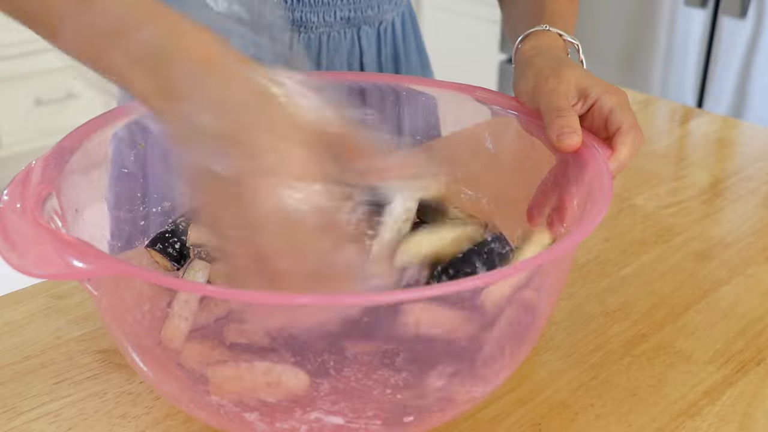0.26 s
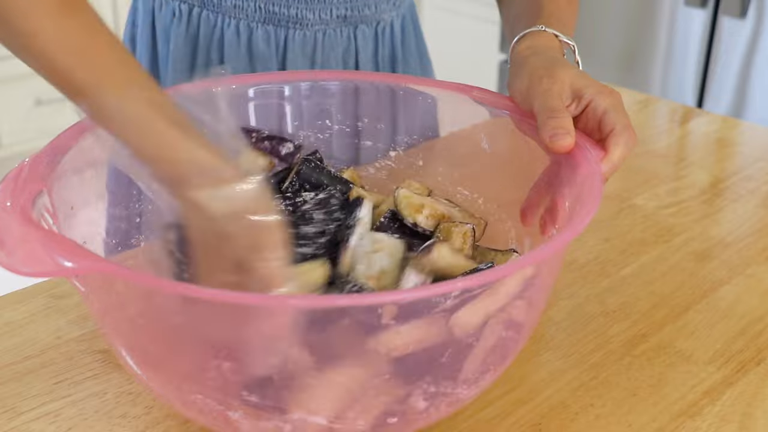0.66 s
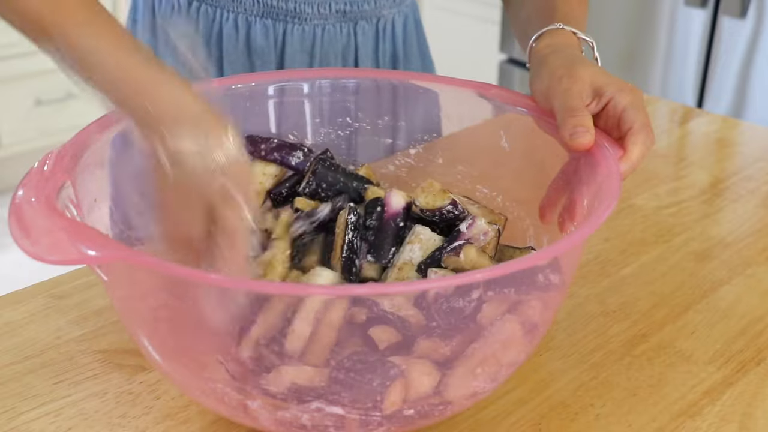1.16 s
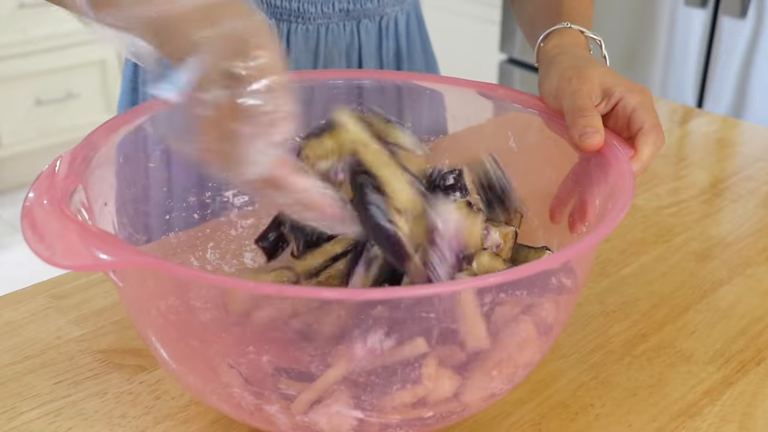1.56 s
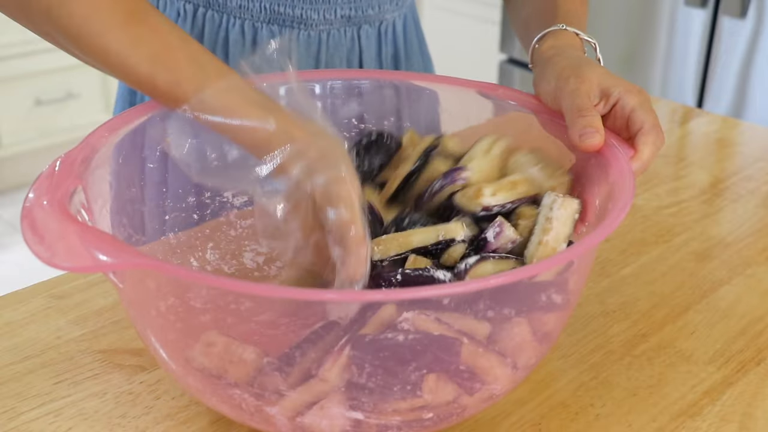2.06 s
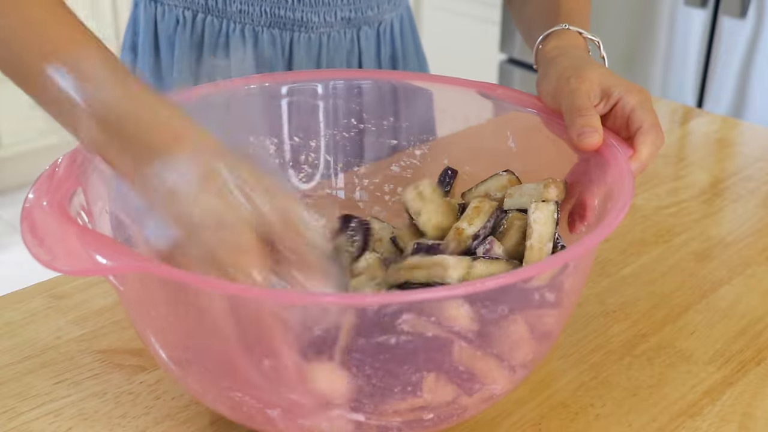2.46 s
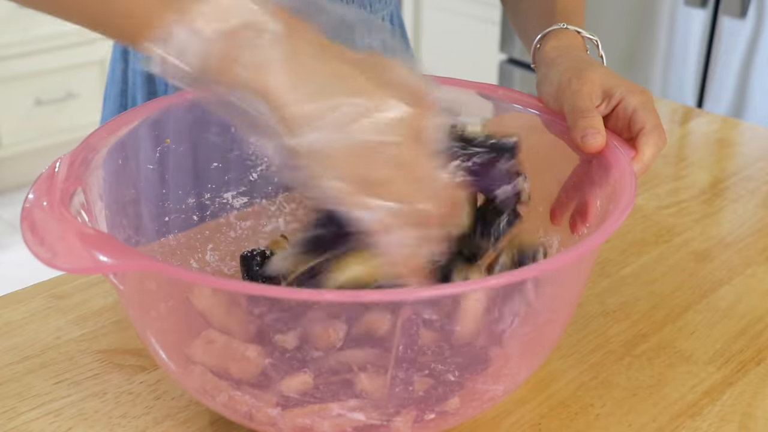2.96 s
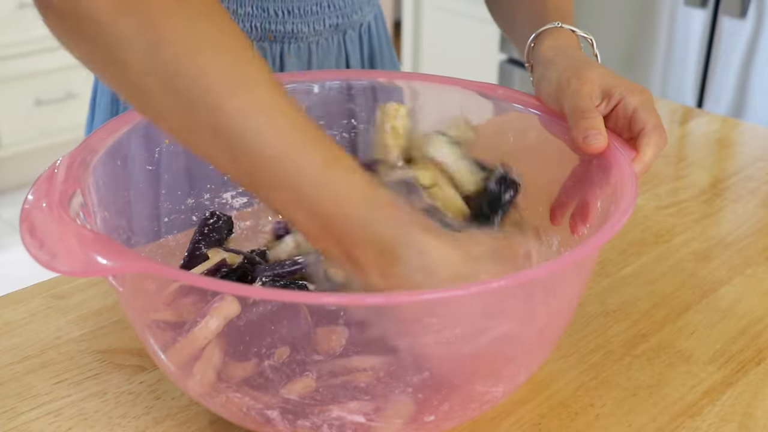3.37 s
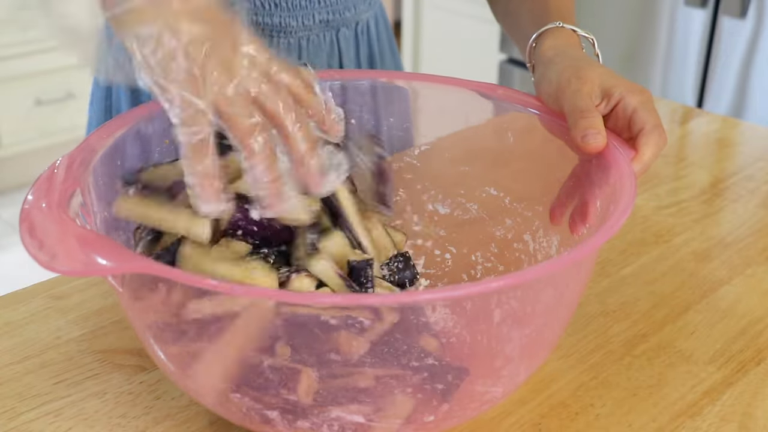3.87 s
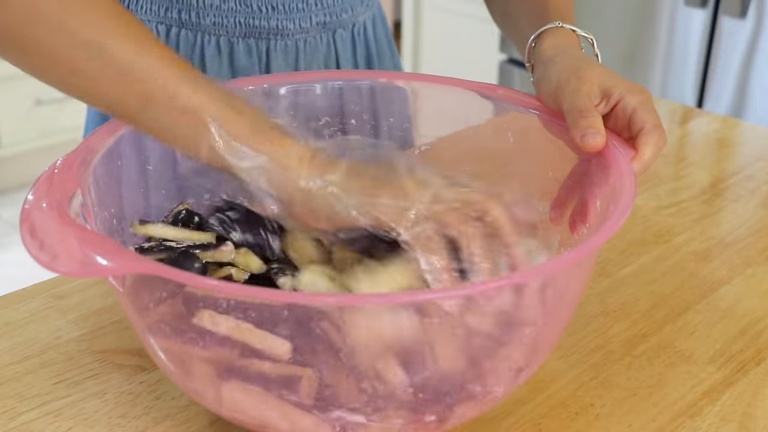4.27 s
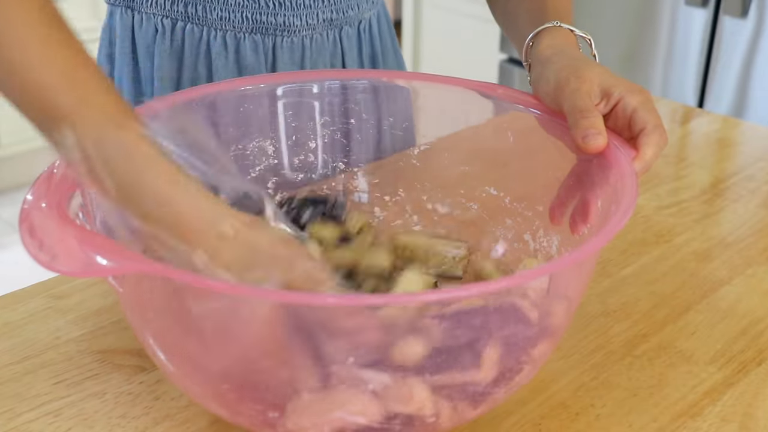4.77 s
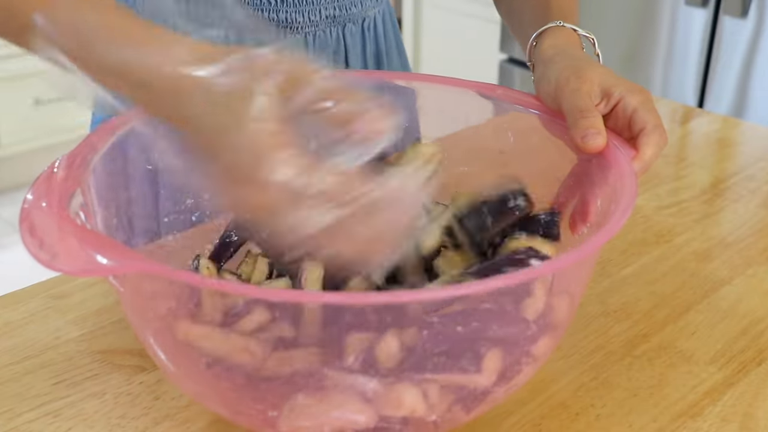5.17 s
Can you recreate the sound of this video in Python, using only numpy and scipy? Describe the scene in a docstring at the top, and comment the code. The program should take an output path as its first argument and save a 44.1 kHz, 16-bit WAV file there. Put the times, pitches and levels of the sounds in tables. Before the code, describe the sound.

Cut vegetables are turned over and over by hand in a plastic bowl, heard up close in a quiet kitchen. Soft tumbling bumps and short, hollow taps mix with the swelling crinkle and little snaps of a thin plastic glove. The strokes keep coming for about five seconds, and brief scrapes and harder knocks stand out toward the end, over a faint low room rumble.

```python
"""Tossing vegetables in a plastic bowl.

A hand in a thin plastic glove tosses starchy vegetable pieces in a bowl on a wooden table.
The pieces knock, tumble and scrape, ringing the bowl wall and thumping the table under it.
The glove's creases rustle and snap. One microphone in a quiet kitchen feeds both channels."""
import sys
import numpy as np
from scipy import signal
from scipy.fft import rfft, irfft, next_fast_len
from scipy.io import wavfile
from scipy.ndimage import map_coordinates

SR = 44100
rng = np.random.default_rng(int(sys.argv[2]) if len(sys.argv) > 2 else 0)


def generate_wav(signal):
    """Clip the signal to [-1, 1] and save it as 16-bit WAV at the path in sys.argv[1]."""
    frames = np.transpose(np.atleast_2d(signal))
    scaled = np.clip(frames, -1, 1) * 32767
    pcm = np.round(scaled).astype(np.int16)
    wavfile.write(sys.argv[1], SR, pcm)


N = 239463
TIME_S = np.arange(N) / SR


def amp(db):
    return 10 ** (np.asarray(db) / 20)


def unit_rms(x):
    return x / np.sqrt(np.mean(x ** 2) + 1e-20)


def over_log_hz(points, hz):
    point_hz, values = np.transpose(points)
    return np.interp(np.log(hz + 1), np.log(point_hz + 1), values)


def over_time(points):
    return np.interp(TIME_S, *np.transpose(points))


def wobble(knots_per_s):
    """Smooth random curve."""
    knots = rng.standard_normal(int(N * knots_per_s / SR) + 4)
    return map_coordinates(knots, [TIME_S * knots_per_s])


def filtered(x, response):
    size = next_fast_len(len(x) + SR // 4)
    return irfft(rfft(x, size) * response(np.fft.rfftfreq(size, 1 / SR)), size)[:len(x)]


def coloured(x, spectrum):
    """x shaped by a spectrum, at rms 1."""
    return unit_rms(filtered(x, lambda hz: amp(over_log_hz(spectrum, hz))))


def grains(per_s, spread_db):
    """Random impulses of either sign, many small and few large, at rms 1."""
    chance, size, sign = rng.random((3, N))
    strength = amp(-spread_db * np.log(size + 0.0018))
    return unit_rms((chance < per_s / SR) * strength * np.sign(sign - 0.5))


# (frequency [Hz], density [dB])
HUSH_SPECTRUM = [(15, -34), (25, 23), (157, 7.5), (500, -17), (769, -11), (929, 1), (1870, -16.5),
                 (3880, -44), (5090, -14), (13400, -52), (15800, -40)]
def kitchen_hush():
    """Steady background noise, mostly low rumble."""
    return amp(-54) * coloured(rng.standard_normal(N), HUSH_SPECTRUM)


# (frequency [Hz], t60 [s])
KITCHEN_DECAY = [(100, 0.62), (1000, 1), (10000, 0.37)]
def kitchen_reverb(x):
    """Each frequency of the room's echo dies at its own rate."""
    hz, t, spectra = signal.stft(rng.standard_normal(SR // 2), SR, nperseg=256)
    decay = amp(-60 * t / over_log_hz(KITCHEN_DECAY, hz)[:, None])
    tail = signal.istft(spectra * decay, SR, nperseg=256)[1]
    return signal.fftconvolve(np.pad(x, (300, 0)), tail / np.linalg.norm(tail))[:N]


# Slow hand strokes: (time [s], level [dB])
STROKES = [(0, -48.5), (.07, -48), (.15, -53), (.28, -55), (.36, -51), (.51, -52), (.6, -51), (.64, -43),
           (.72, -45.5), (.86, -56.5), (1.06, -57), (1.17, -52), (1.25, -43), (1.36, -52.5), (1.63, -56),
           (1.74, -65.5), (1.84, -52), (1.91, -43), (2.03, -42.5), (2.12, -57), (2.27, -50.5), (2.36, -54),
           (2.5, -49), (2.68, -46), (2.75, -53), (3, -57), (3.19, -53), (3.3, -48.5), (3.36, -43),
           (3.43, -50), (3.72, -56.5), (3.9, -52.5), (4.1, -47.5), (4.19, -44.5), (4.3, -50.5),
           (4.43, -56.5), (4.53, -52.5), (4.58, -46.5), (4.74, -46.5), (4.8, -46.5), (4.95, -48),
           (5.06, -56), (5.13, -52.5), (5.23, -58.5), (5.43, -57)]
# Sudden grabs: (time [s], level [dB])
GRABS = [(0.303, -57), (0.539, -63), (.97, -50.5), (1.081, -49), (1.754, -45), (1.775, -42.5), (2.859, -62),
         (3.208, -46.5), (4.462, -43.5), (5.283, -48.5), (5.341, -43)]
def hand_motion_db(rise_s=0.012, fade_s=0.033):
    """Rustle level: the glove flexes with each stroke and crumples at each grab."""
    grab_s, grab_db = np.transpose(GRABS)[:, :, None]
    age_s = TIME_S - grab_s
    envelopes = np.where(age_s < 0, np.clip(1 + age_s / rise_s, 0, 1), np.exp(-np.abs(age_s) / fade_s))
    return 20 * np.log10(amp(over_time(STROKES)) + (amp(grab_db) * envelopes).sum(0))


def crinkle(spectrum, creases, tick_t60_s=0.0012):
    """The film hisses, with sparse ticks of its own."""
    tick = amp(-60 * np.arange(SR // 100) / SR / tick_t60_s)
    ticks = unit_rms(np.convolve(np.abs(grains(130, spread_db=0.2)), tick)[:N])
    hiss = (1 + 0.77 * ticks) * rng.standard_normal(N)
    return coloured(hiss + 0.7 * creases, spectrum)


# Glove midrange, treble and top treble: (frequency [Hz], density [dB])
RUSTLE_SPECTRUM = [(500, -14), (950, -4.5), (1400, -2), (1900, -4.5), (2700, -2.5), (3750, 0), (4300, -2.5),
                   (4900, -14), (7000, -43)]
FILM_SPECTRUM = [(1500, -29), (4500, -5.5), (6000, -0.5), (8500, -2), (10000, -19)]
SHEEN_SPECTRUM = [(7000, -49), (9000, -0.5), (11000, 0.5), (14000, 0), (16000, -4.5)]
def glove_rustle(hand_db):
    """Dense small creases come in clumps; the treble grows a little less than the midrange."""
    treble_db = hand_db - 2.5 - 0.092 * (hand_db - hand_db.mean())
    clumps = amp(1.38 * wobble(40) + 1.18 * wobble(180))
    creases = grains(5000, spread_db=4) + 0.8 * rng.standard_normal(N)
    midrange = coloured(creases, RUSTLE_SPECTRUM)
    treble = crinkle(FILM_SPECTRUM, creases) + 0.99 * crinkle(SHEEN_SPECTRUM, creases)
    return amp(hand_db) * unit_rms(clumps * midrange) + amp(treble_db) * unit_rms(clumps * treble)


# Lowest band of a snap: (frequency [Hz], density [dB])
SNAP_LOW_SPECTRUM = [(1500, -20), (2600, -7.5), (3800, 1), (4600, -7), (6500, -24)]
# (time [s], peak [dB], sheen gain [dB])
SNAPS = [(0.3237, -29.5, -13), (0.375, -33.5, -2), (0.5744, -39, -17), (0.6148, -27.5, -12),
         (1.0261, -31.5, -18), (1.075, -32, -7), (1.1183, -34.5, -27), (1.3823, -33.5, -11),
         (1.4612, -29, -8), (1.5944, -29.5, -11), (1.6616, -46, -15), (1.694, -42, -8), (1.736, -37, -12),
         (1.7998, -25, -14), (1.8746, -35, -22), (1.944, -27, -10), (1.9592, -23, -20), (1.9964, -31, -18),
         (2.0685, -34.5, -8), (2.159, -32, -15), (2.486, -29, -17), (2.6065, -35, -20),
         (2.8562, -36.5, -24), (2.9093, -34, -11.5), (3.2056, -45, -6), (3.6087, -32, -9),
         (3.6816, -34, -16.5), (3.7459, -28.5, -12.5), (3.8467, -29.5, -18), (3.8861, -32.5, -15),
         (3.9868, -32.5, -33), (4.0735, -33, -13), (4.1032, -26, -11), (4.1835, -26.5, -31),
         (4.2299, -28, -7), (4.2587, -30, -8), (4.6857, -27.5, -14), (4.7317, -26.5, -17),
         (4.8482, -29.5, -12), (5.0116, -33, -7), (5.0814, -30, -3), (5.1158, -33, -10),
         (5.1905, -33.5, -12), (5.2866, -32, -21), (5.3784, -30.5, -14)]
def glove_snaps(rise_s=0.005):
    """Large creases snap in short bursts; the less sheen, the stronger the low band."""
    out = np.zeros(N)
    t = np.arange(SR // 50) / SR
    envelope = amp(-60 * np.abs(t - rise_s) / np.where(t < rise_s, 0.004, 0.02))
    spectra = SNAP_LOW_SPECTRUM, FILM_SPECTRUM, SHEEN_SPECTRUM
    for time_s, peak_db, sheen_db in SNAPS:
        puff = rng.standard_normal(len(t)) * envelope
        bands = np.array([coloured(puff, spectrum) for spectrum in spectra])
        bands /= np.abs(bands).max(axis=1)[:, None]
        low_db = -13.5 - 1.14 * (sheen_db + 17.5)
        burst = amp([low_db, -23, sheen_db - 10]) @ bands
        start = round((time_s - 0.0035) * SR)
        out[start:][:len(t)] += amp(peak_db) * burst[:N - start] / np.abs(burst).max()
    return out


# Modes of table and bowl: (frequency [Hz], level [dB], t60 [s])
MODES = [(85.4, -7, 0.14), (123, -11, 0.086), (158, -3.5, 0.097), (190.3, -9, 0.1), (275, -9, 0.08),
         (316.8, -2.5, 0.09), (351, -3, 0.063), (422, -7, 0.087), (496.6, -5, 0.052), (559, -4.5, 0.041),
         (617.5, -3.5, 0.022), (728.3, -7, 0.024), (861, -11.5, 0.027), (958, -4.5, 0.02),
         (1142, -10, 0.023), (1363, -4.5, 0.013), (1632, -6, 0.0098), (1970, -10, 0.013),
         (2345, -20.5, 0.018), (2930, -15.5, 0.0076)]
# Top of each part's modes, edge above: (table [Hz], lower wall [Hz], upper wall [Hz])
PART_TOP_HZ = [220, 450, 700]
def bowl_ring(part_db, scatter_db, detune, rise_cycles=0.43):
    """Modes ring after one blow; part_db weights table, lower wall, upper wall and edge."""
    t = np.arange(SR // 6) / SR
    hz, mode_db, t60_s = np.transpose(MODES)[:, :, None]
    part = np.searchsorted(PART_TOP_HZ, hz)
    level_draw, pitch_draw = rng.standard_normal((2, len(MODES), 1))
    level_db = mode_db + np.asarray(part_db)[part] + scatter_db * level_draw
    envelope = amp(level_db - 60 * t / t60_s) * (1 - np.exp(-t * hz / rise_cycles))
    # Neighbouring table modes swing against each other, leaving little below the lowest.
    polarity = np.where(part == 0, (-1.0) ** np.arange(len(MODES))[:, None], 1)
    return (polarity * envelope * np.sin(2 * np.pi * hz * (1 + detune * pitch_draw) * t)).sum(0)


def shaken_bowl(force, part_db):
    """Small blows drive the bowl; the heap shifts, so three tunings take turns."""
    heap_position = np.clip(1 + 1.26 * wobble(7), 0, 2)
    out = np.zeros(N)
    for tuning in range(3):
        ring = bowl_ring(part_db, scatter_db=1.23, detune=0.046)
        crossfade = np.sqrt(np.clip(1 - np.abs(heap_position - tuning), 0, 1))
        out += signal.fftconvolve(force * crossfade, ring / np.linalg.norm(ring))[:N]
    return out


# Hard drags: (start [s], length [s], gain [dB], extra upper wall gain [dB])
SCRAPES = [(0.888, 0.048, -53.5, -3), (1.076, 0.019, -43, 14), (1.769, 0.017, -47, 18),
           (3.203, 0.018, -43, -22), (4.441, 0.079, -41, -3), (4.865, 0.059, -31, -2.5),
           (4.926, 0.0348, -34, -1), (5.05, 0.09, -45, -26), (5.332, 0.04, -45, 22.5)]
def sliding(hand_db):
    """Pieces chatter on upper wall and edge, following the hand and swelling when dragged hard."""
    slide_db = -58 + 0.53 * (hand_db - hand_db.mean())
    start_s, length_s, drag_db, upper_db = np.transpose(SCRAPES)
    progress = (TIME_S - start_s[:, None]) / length_s[:, None]
    drags = np.clip(1 - (2 * progress - 1) ** 4, 0, 1)
    slips = amp(1.8 * wobble(60)) * grains(2500, spread_db=4)
    edge = (amp(slide_db) + amp(drag_db - 6) @ drags) * slips
    upper_wall = (amp(slide_db - 8) + amp(drag_db + upper_db - 13) @ drags) * slips
    return shaken_bowl(edge, [-56, -26.5, -11, 0]) + shaken_bowl(upper_wall, [-52, -27.5, 4.5, -9.5])


# Tumbling strength: (time [s], level [dB])
TUMBLE = [(0.0, -54), (1.07, -51.5), (1.24, -58), (1.54, -57), (1.89, -54), (2.22, -53), (2.42, -49.5),
          (2.55, -44.5), (2.86, -60.5), (3.18, -52.5), (3.69, -58.5), (3.96, -50), (4.46, -48.5),
          (4.61, -56.5), (4.9, -56.5), (5.07, -43.5), (5.32, -56), (5.43, -35)]
def tumbling():
    """Pieces roll over each other; their soft bumps shake table and lower wall."""
    force_db = over_time(TUMBLE) + 1 + 2 * wobble(12)
    bumps = amp(force_db) * grains(900, spread_db=2)
    return shaken_bowl(bumps, [3, -7, -16, -39])


# Base balance of a knock: (table [dB], lower wall [dB], upper wall [dB], edge [dB])
KNOCK_PART_DB = [-1.5, -3.5, 0.5, 0.5]
# Tilt per hardness step: (lower wall [dB], upper wall [dB], edge [dB])
HARDNESS_TILT_DB = [-11, 4, 10]
# (time [s], gain [dB], table gain [dB], hardness [about 1 soft to 3 hard])
KNOCKS = [(0.045, -34, -43, 2.3), (0.141, -38, -8, 2.4), (0.24, -33, 1.5, 1.34), (0.402, -23, -12, 2.83),
          (0.459, -24.5, -10, 0.88), (0.648, -34.5, -0.5, 2.24), (0.684, -34, 1.5, 1.84),
          (0.815, -38, 9, 2.34), (0.941, -17.5, -18, 1.86), (1.015, -30.5, -6.5, 1.66),
          (1.081, -32, 3, 2.4), (1.088, -33, -13, 1.6), (1.133, -22.5, -15.1, 2.6), (1.15, -30.5, -1, 1.2),
          (1.511, -32.5, -2.4, 2.36), (1.644, -43, 0, 1.7), (1.671, -37, 0, 1.2),
          (1.774, -28.5, -7.4, 2.23), (1.805, -29, -2.3, 0.72), (1.896, -31, 3, 2.28), (2.157, -33, 1, 1.8),
          (2.236, -32.5, 1, 1.75), (2.26, -37.5, -9, 1.9), (2.298, -30.5, 1.5, 1.9), (2.316, -33, 8, 1.9),
          (2.327, -34, 8, 2.2), (2.362, -37, 12.5, 1.5), (2.385, -36, 9, 1.6), (2.432, -32, 12.5, 1.76),
          (2.484, -29.5, -1, 2.8), (2.512, -23, -5, 2.3), (2.519, -23.5, -1, 1.43), (2.536, -31.9, 8, 1.2),
          (2.55, -31.5, 1, 2.14), (2.635, -32, -19, 1.7), (2.697, -20.5, -2, 2.12), (3.097, -45, 13, 1.3),
          (3.118, -35.5, 9, 2.5), (3.143, -24.5, 4.5, 1.96), (3.745, -30.5, -5, 1.1),
          (3.817, -39.5, -1.7, 2.24), (3.86, -36, 5, 1.2), (3.913, -47, -5, 1.6), (3.95, -14, -7, 2.55),
          (4.038, -33.5, -6, 2.26), (4.208, -28, -17, 2.36), (4.313, -34, -4, 2.03),
          (4.433, -29, 3.5, 1.27), (4.456, -24.5, -9.0, 2.35), (4.49, -31, 2.3, 1.4),
          (5.038, -18.4, -20, 2.04), (5.095, -25.5, -2, 1.5), (5.166, -28.5, -4, 1.78),
          (5.22, -37.5, 6, 1.6), (5.345, -19, -8, 2.25)]
def knocks():
    """Pieces strike the bowl: hard ones bring out the edge, soft ones stay longer and round the blow."""
    out = np.zeros(N + SR)
    for time_s, gain_db, table_db, hardness in KNOCKS:
        contact_s = min(0.00055 * amp(-3.5 * (hardness - 1.5)), 0.003)
        pulse = np.hanning(3 + round(contact_s * SR))
        wall_db = np.multiply(HARDNESS_TILT_DB, hardness - 2)
        part_db = np.add(KNOCK_PART_DB, [table_db, *(wall_db - wall_db.max())])
        ring = bowl_ring(part_db, scatter_db=2.57, detune=0.032)
        blow = signal.fftconvolve(ring, pulse / pulse.sum())
        out[round((time_s + 0.0024) * SR):][:len(blow)] += amp(gain_db) * blow
    return out[:N]


def scene():
    """Bowl and glove close by, their echo and the kitchen's hush."""
    hand_db = hand_motion_db()
    direct = knocks() + tumbling() + sliding(hand_db) + glove_rustle(hand_db) + glove_snaps()
    mono = direct + kitchen_hush() + amp(-15.5) * kitchen_reverb(direct)
    return np.tile(mono, (2, 1))


def record(dry, bass_cut_hz=40, top_hz=15800):
    """The microphone drops the deepest bass; the recorder keeps nothing above its band limit."""
    def response(hz):
        return (1j * hz / (bass_cut_hz + 1j * hz)) ** 3 * (hz < top_hz)
    return np.array([filtered(channel, response) for channel in dry])


dry = scene()
out = record(dry)
generate_wav(out)
```